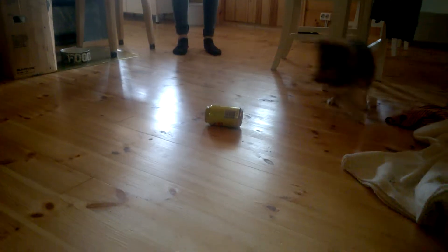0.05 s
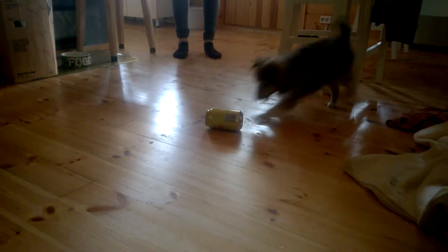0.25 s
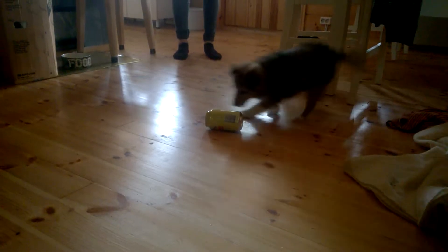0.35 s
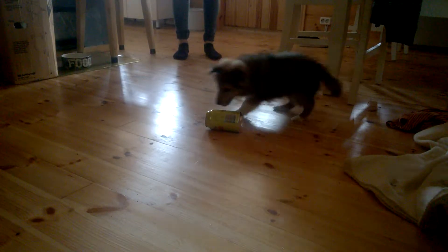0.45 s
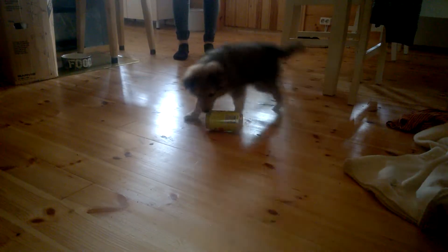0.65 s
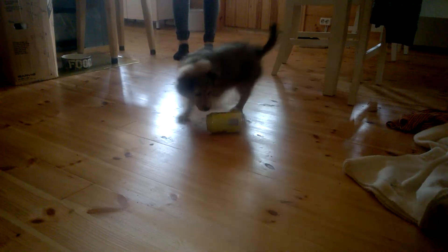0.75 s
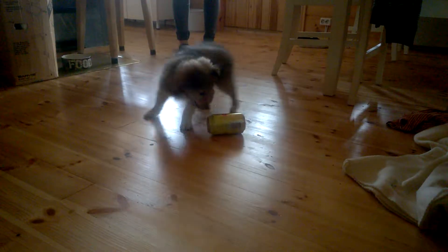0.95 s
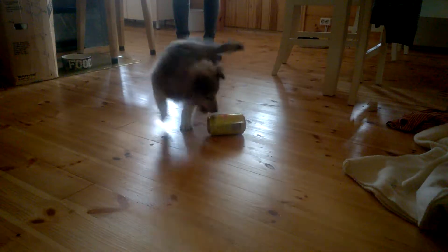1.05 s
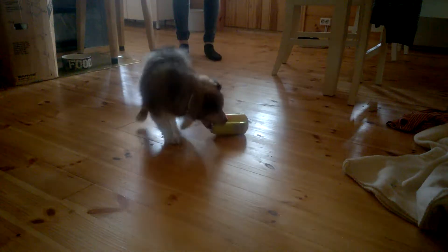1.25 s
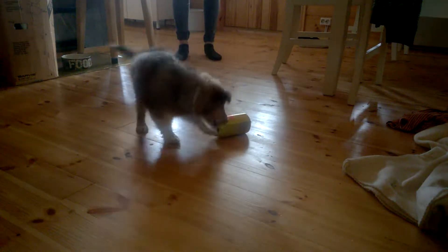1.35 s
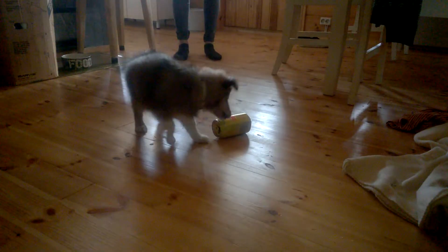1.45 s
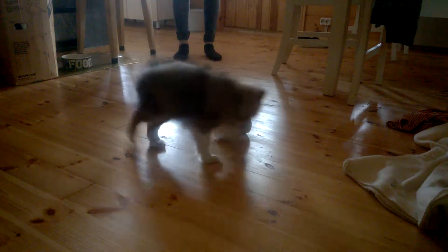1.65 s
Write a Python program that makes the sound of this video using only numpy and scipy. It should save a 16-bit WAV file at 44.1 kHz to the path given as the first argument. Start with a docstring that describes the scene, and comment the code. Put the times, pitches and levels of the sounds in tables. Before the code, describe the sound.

Ringing clatter of a drink can knocked across floorboards, with a puppy's soft paw thumps.

```python
"""Puppy bats an empty can

A puppy pounces across a wooden floor: its paws thump the boards and scuff over the varnish.
It bats an empty drink can, which clatters, rocks and rings, each contact a crack that sets the thin
shell sounding. Then its muzzle nudges the can and stills it. A small quiet room answers with early
echoes and a short tail."""
import sys
import numpy as np
from scipy import signal
from scipy.fft import rfft, irfft
from scipy.io import wavfile

SR = 44100
rng = np.random.default_rng(int(sys.argv[2]) if len(sys.argv) > 2 else 0)


def dump_mix(stems):
    """Bounce the given channels to the path in sys.argv[1] as a 16-bit WAV at rate SR."""
    frames = np.atleast_2d(stems).T  # one column per channel
    limited = np.clip(frames, -1, 1)  # hard clip at full scale
    pcm = np.round(limited * 32767).astype(np.int16)
    wavfile.write(sys.argv[1], SR, pcm)


N = 74970

# The can hitting the floor. Each row: start in seconds, level in dB, brightness in Hz,
# place struck (0 rim, 1 shoulder, 2 and up wall), crack trim in dB, ring trim in dB.
CAN_HITS = [(.7897, -1.5, 5700, 0.029, -0.5, -4), (0.7977, -13, 3530, 0, 20, -11),
            (.8047, -4, 3500, 0, -11, -0.5), (.8120, -3.5, 4000, 0.35, 6, 2),
            (0.8694, -.5, 4270, 0.044, 11, -1.5), (.8782, -4.5, 2540, 0.76, 3, 0.5),
            (.9305, -3, 4400, 0.57, 10.5, 0), (.9530, -6, 2560, 0.36, 9, 3),
            (0.9764, -8.5, 2220, 0.58, 10, 4), (1.0097, -9, 1830, 0.7, 14, 2.5),
            (1.0350, -11, 2450, 1.21, 9, 6), (1.0560, -17, 1780, 0.74, 14, 11.5),
            (1.0770, -18, 1830, 1.78, 3, 9.5), (1.195, -11.5, 710, 2, -2, -6),
            (1.219, -12, 1630, 2, -10, 2.5), (1.240, -9.5, 790, 1.74, -5.5, -10.5),
            (1.2593, -20, 1494, 2.4, 16, -8), (1.3157, -6, 1970, 2, 13, 0),
            (1.3340, -10.5, 1880, 1.43, 6, 7.5), (1.3518, -13.5, 1760, 1.23, -3, -7),
            (1.3665, -11, 1180, 1.7, 4, 5), (1.3815, -12, 2290, 1.93, 12, 8),
            (1.4060, -13, 2140, 2.2, 4, -5), (1.425, -14.5, 1520, 1.15, -17, -4),
            (1.4500, -12, 1700, 2.1, -3, -1.5), (1.476, -18, 1390, 2.3, -1, -4)]
def can(hold_s=1.52, hold_fade_s=0.12):
    """The can bounces on its rims, rocks on its wall and is stilled by the resting muzzle."""
    out = np.zeros(N)
    for start, db, bright_hz, place, crack_db, ring_db in CAN_HITS:
        add(out, start, undb(db) * knock(bright_hz, place, crack_db, ring_db))
    held_s = np.maximum(np.arange(N) / SR - hold_s, 0)
    return out * np.exp(-held_s / hold_fade_s)


def knock(bright_hz, place, crack_db, ring_db, rise_s=0.0013):
    """One contact: a crack, then clatter and ring bloom behind it. Soft contacts are duller."""
    t = np.arange(32768) / SR
    on_wall = np.clip(place - 1, 0, 1)
    body = clatter(t, on_wall) + undb(ring_db) * ring(t, place, on_wall)
    hit = undb(crack_db) * crack(t, on_wall) + body * (1 - np.exp(-t / rise_s))
    pole = np.exp(-2 * np.pi * bright_hz / SR)
    return signal.lfilter([1 - pole], [1, -pole], hit)


# Early slaps off the room. Each row: delay in seconds, level in dB against the direct crack.
ECHOES = [(.0092, 1), (0.0157, -2.5), (0.022, -8.5)]
def crack(t, on_wall, rim_hz=1297, wall_hz=876, width_cycles=0.71, wall_echo_db=-12.5):
    """A short pulse and its echoes, which are weaker off the wall: it sends less sound upward."""
    cycles = t * (rim_hz + on_wall * (wall_hz - rim_hz)) - 1
    pulse = -undb(-30) * np.sin(2 * np.pi * cycles) * np.exp(-(cycles / width_cycles) ** 2)
    out = pulse.copy()
    for delay, db in ECHOES:
        add(out, delay, undb(db + on_wall * wall_echo_db) * pulse)
    return out


# The can's ringing notes. Each row: pitch in Hz, level in dB when struck on the rim,
# on the shoulder and on the wall, seconds to fall 60 dB.
CAN_MODES = [(523.8, -40.5, -46.5, -41.5, 0.65), (660.6, -32, -36, -40.5, 0.22),
             (776.6, -35, -48.5, -32, 0.24), (835, -64, -42, -46.5, 0.41), (1003, -53, -45, -66.5, 0.34),
             (1150, -49, -58.5, -48, 0.58), (1230.4, -31, -41, -53, 0.17), (1323.7, -35.5, -52, -57, .6),
             (1480, -44.5, -34.5, -58.5, 0.56), (1552, -53, -34.5, -55, 0.51), (1593, -43, -41, -43, 0.29),
             (1811, -34.5, -44, -62, 0.3), (2242, -38, -47, -52, 0.17), (2305, -46.5, -46, -67, 0.45),
             (2357, -48, -58, -47.5, 0.26), (2980, -40, -44.5, -70, 0.12), (3035, -29, -69, -68, 0.098),
             (3410, -43, -74, -46, 0.16), (3523, -34, -76, -44, 0.19), (4570, -46, -79, -51, 0.24),
             (4740, -61, -62, -47.5, 0.15)]
def ring(t, place, on_wall, turn_hz=11.4, swell_depth=0.34, detune=0.0017, waver=0.0053):
    """The shell's modes shift and swell as the can turns; on its wall they also waver in pitch."""
    out = 0
    for hz, *by_place_db, t60 in CAN_MODES:
        gain = undb(np.interp(place, [0, 1, 2], by_place_db))
        rocking = np.sin(2 * np.pi * (turn_hz * (0.5 + rng.random()) * t + rng.random()))
        bend = 1 + detune * rng.standard_normal() + on_wall * waver * rocking
        cycles = hz * np.cumsum(bend) / SR + rng.random()
        swell = 1 + swell_depth * rocking
        out += gain * swell * decay(t, t60) * np.sin(2 * np.pi * cycles)
    return out


# The colour of the clatter. Each row: frequency in Hz, relative level in dB for a hit
# on the rim or shoulder, and for a hit on the wall.
CLATTER_COLOUR = [(62, -34, -10), (118, -7.5, -5), (165, 5.5, 9.5), (194, -4, -4), (229, 3.5, 8.5),
                  (286, -9, 5), (670, -4, 1), (955, -7.5, -22), (1530, -3, -12.5), (2120, -10, -21),
                  (2360, -8.5, -17), (2610, -23, -28.5), (2990, -16, -26), (4040, -13.5, -14.5),
                  (4250, -14, -16), (4960, -20, -25), (6400, -21, -18), (9400, -30, -34), (15900, -51, -33)]
def clatter(t, on_wall, rim_t60_s=0.36, wall_t60_s=0.31, damping=0.16):
    """Crowded modes of can and boards die away, highs first, sooner with the wall on the floor."""
    colour = [(hz, rim + on_wall * (wall - rim)) for hz, rim, wall in CLATTER_COLOUR]
    t60_at_1khz = rim_t60_s + on_wall * (wall_t60_s - rim_t60_s)
    f = np.fft.rfftfreq(len(t), 1 / SR)
    spectrum = rfft(noise(colour, len(t))) * tinny_gain(f)
    centres_hz = [128, 512, 2048, 8192]
    out = 0
    for hz, share in zip(centres_hz, np.eye(len(centres_hz))):
        crossover = np.interp(np.log2(f + 1), np.log2(centres_hz), share)
        out += irfft(spectrum * crossover) * decay(t, t60_at_1khz * (1000 / hz) ** damping)
    return undb(-30.5) * out


# The tinny edge of the clatter. Each entry: a high partial of the shell in Hz.
SHELL_HZ = [2995, 3230, 3412, 3500, 3596, 3775, 3871, 4510, 4900, 4980, 5150, 5400, 6250, 6690, 6835, 8100]
def tinny_gain(f, width_hz=24, peak_db=9, between_db=-6):
    """An EQ curve that gathers the treble into the shell's thin partials."""
    peaks = sum(np.exp(-((f - hz) / width_hz) ** 2) for hz in SHELL_HZ)
    in_range = (f > min(SHELL_HZ)) & (f < max(SHELL_HZ))
    return np.where(in_range, undb(between_db) + undb(peak_db) * peaks, 1)


# The colour of a pad's rub. Each row: frequency in Hz, relative level in dB.
PAD_COLOUR = [(60, 1), (160, 11.5), (300, 1.5), (430, -11), (640, 2.5), (900, -9.5), (1200, -9),
              (1550, -24), (1900, -15), (2300, -35), (8000, -50)]
# Paws landing. Each row: start in seconds, boom level in dB, board pitch in Hz,
# seconds under load, swell time in seconds, rub level in dB.
PAW_STEPS = [(0.019, -41, 96.5, 0.0019, 0.0015, -53.5), (.231, -18, 152.3, 0.047, 0.026, -55),
             (0.2793, -16.5, 158.3, 0.0444, 0.009, -34.5), (.345, -42, 155.5, 0.088, .02, -51),
             (0.463, -47, 141, 0.03, 0.0048, -74.5), (0.658, -34.5, 149, 0.0044, 0.0062, -78),
             (0.673, -33.5, 157.4, 0.03, 0.018, -64), (0.691, -45, 166, 0.026, 0.0044, -53.5),
             (.760, -46.5, 161, 0.021, 0.0045, -55.5), (0.799, -30.5, 166, 0.032, 0.0058, -41),
             (1.000, -37, 150, 0.067, .01, -53), (1.225, -37, 231.4, 0.034, 0.0068, -46.5),
             (1.335, -32.5, 145.7, 0.032, 0.0072, -72), (1.415, -36.5, 148.7, 0.039, 0.012, -45),
             (1.577, -39, 170, 0.014, 0.0092, -52.5), (1.602, -38.5, 180, 0.015, 0.0061, -50.5)]
def paws(sag_s=0.064, glide_per_s=0.51, boom_release_s=0.0063, rub_rise_s=0.00023, rub_release_s=0.012):
    """Each pad rubs while two board modes boom and bend up under its load; both stop as it settles."""
    out, t = np.zeros(N), np.arange(SR // 2) / SR
    for start, boom_db, hz, load_s, swell_s, rub_db in PAW_STEPS:
        settled_s = np.maximum(t - load_s, 0)
        sag = np.exp(-t / sag_s)
        phase = 2 * np.pi * hz * t * (1 + glide_per_s * t / 2)
        modes = np.sin(phase) + undb(-17) * np.sin(1.42 * phase)
        boom = modes * sag * (1 - np.exp(-t / swell_s)) * np.exp(-settled_s / boom_release_s)
        rub_shape = sag * (1 - np.exp(-t / rub_rise_s)) * np.exp(-settled_s / rub_release_s)
        rub = noise(PAD_COLOUR, len(t)) * rub_shape
        hollow_plank = undb(10.5) * band(rub, hz=526.4, width_hz=16)
        add(out, start, undb(boom_db) * boom + undb(rub_db) * (rub + hollow_plank))
    return out


# Skids on the varnish. Each row: start in seconds, length in seconds, level in dB,
# centre in Hz, width in Hz, fade-in as a share of the length.
SCUFFS = [(0.145, 0.071, -68, 2660, 1520, 0.42), (0.349, 0.099, -63, 3830, 4080, 0.38),
          (1.188, 0.11, -69.5, 7240, 8500, 0.41), (1.255, 0.084, -64, 7900, 8800, .04),
          (1.625, 0.11, -64.5, 4300, 4600, 0.35)]
def scuffs(grain_db=2, grain_samples=128):
    """Sliding paws hiss briefly; the claws catch and make the hiss grainy."""
    out, t = np.zeros(N), np.arange(N) / SR
    for start, length, db, hz, width_hz, rise in SCUFFS:
        catches = undb(grain_db * rng.standard_normal(N // grain_samples + 1))
        friction = np.repeat(catches, grain_samples)[:N] * rng.standard_normal(N)
        hiss = unit(band(band(friction, hz, width_hz), hz, width_hz))
        fade = np.interp((t - start) / length, [0, rise, 1], [0, 1, 0])
        out += undb(db) * hiss * fade
    return out


def room(x, tail_db, t60_s=0.34):
    """The small room adds a weak diffuse tail."""
    t = np.arange(SR // 2) / SR
    tail = rng.standard_normal(len(t)) * decay(t, t60_s)
    return x + undb(tail_db) * signal.fftconvolve(x, tail / np.linalg.norm(tail))[:N]


# The bed under everything. Each row: frequency in Hz, relative level in dB.
ROOM_TONE_COLOUR = [(12, -31.5), (20, 1), (54, -6.5), (75, -10), (345, -20.5), (542, -26.5), (1130, -30.5),
                    (1580, -33), (5600, -35.5), (7900, -47), (16900, -41.5)]
def room_tone(db=-59):
    """The quiet room's faint, steady rumble and hiss."""
    return undb(db) * noise(ROOM_TONE_COLOUR, N)


def undb(db):
    """Decibels to gain."""
    return 10 ** (np.asarray(db) / 20)


def unit(x):
    """Scale to rms 1."""
    return x / np.sqrt(np.mean(x ** 2))


def decay(t, t60):
    """A fade that falls 60 dB in t60 seconds."""
    return np.exp(-np.log(1000) * t / t60)


def add(out, start_s, x):
    """Mix a sound in at a time."""
    i = int(start_s * SR)
    out[i:i + len(x)] += x[:max(len(out) - i, 0)]


def band(x, hz, width_hz):
    """Two-pole resonance, gain 1 at the centre."""
    w = 2 * np.pi * hz / SR
    a = np.sin(w) * width_hz / hz / 2
    return signal.lfilter([a, 0, -a], [1 + a, -2 * np.cos(w), 1 - a], x)


def noise(colour, size):
    """Noise of rms 1, shaped by (Hz, dB) points."""
    hz, db = np.array(colour).T
    f = np.fft.rfftfreq(size, 1 / SR)
    gain = undb(np.interp(np.log(f + 1), np.log(hz), db))
    return unit(irfft(gain * np.exp(2j * np.pi * rng.random(len(f))), size))


def scene():
    """Can and scuffs in the room, the paws drier, all over room tone, in mono."""
    mix = room(can() + scuffs(), tail_db=-9) + room(paws(), tail_db=-17) + room_tone()
    return mix[None]


def record(dry, top_hz=17100):
    """A steep low-pass trims the very top."""
    return signal.sosfilt(signal.ellip(10, 0.2, 80, top_hz, fs=SR, output="sos"), dry)


dry = scene()
out = record(dry)
dump_mix(out)
```